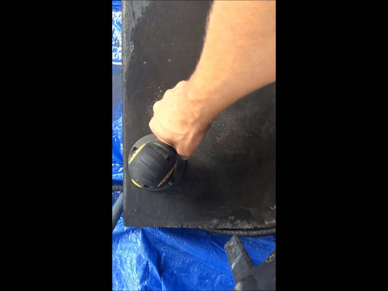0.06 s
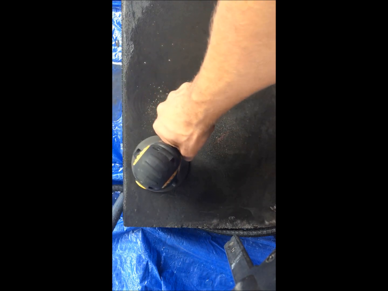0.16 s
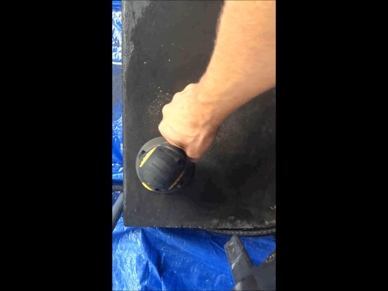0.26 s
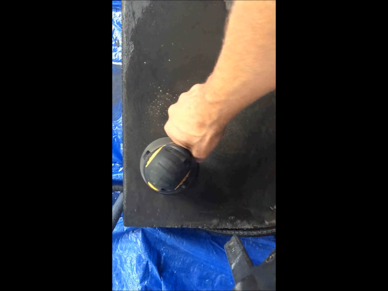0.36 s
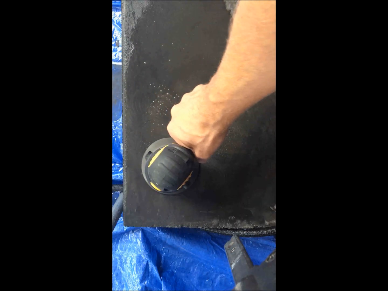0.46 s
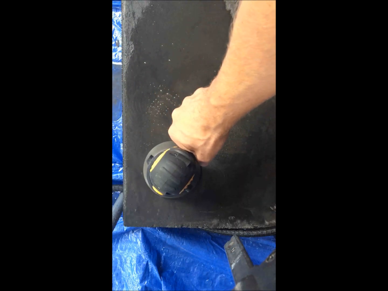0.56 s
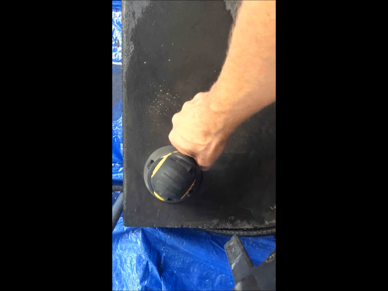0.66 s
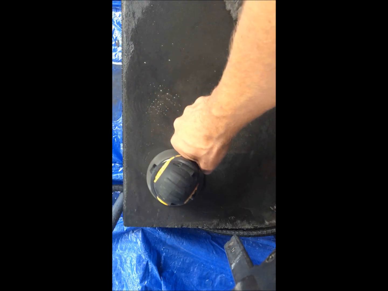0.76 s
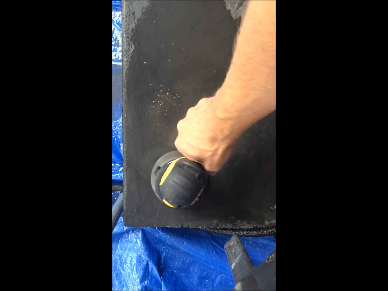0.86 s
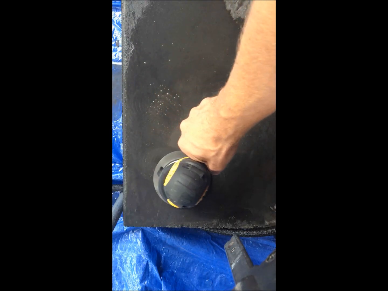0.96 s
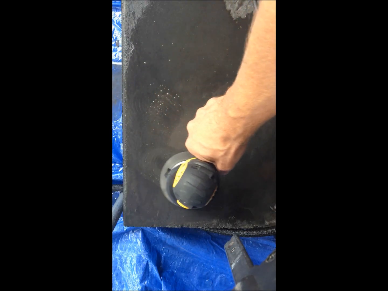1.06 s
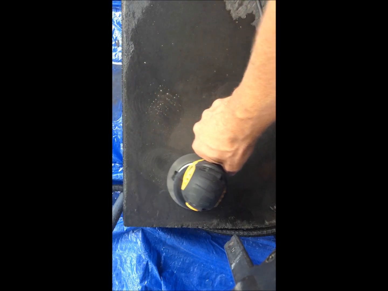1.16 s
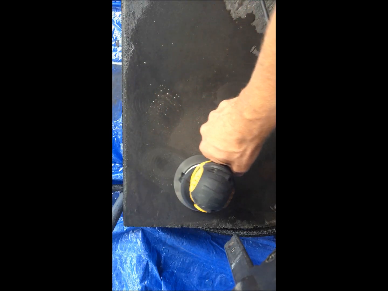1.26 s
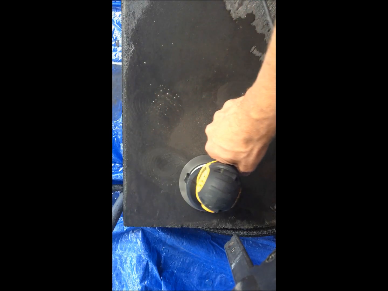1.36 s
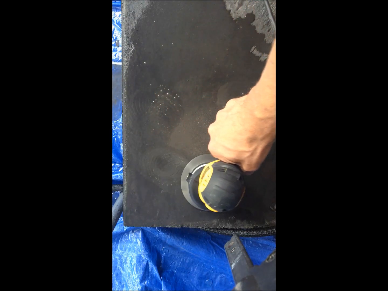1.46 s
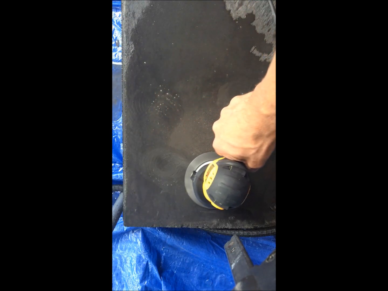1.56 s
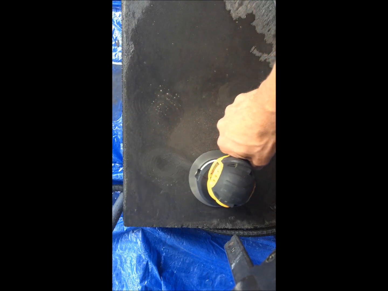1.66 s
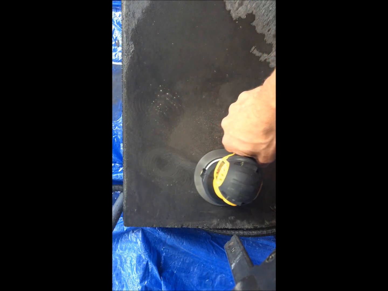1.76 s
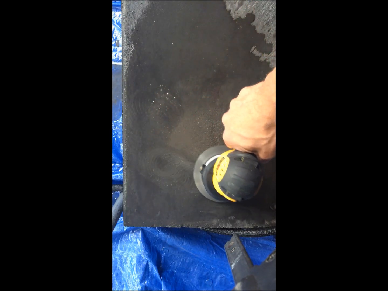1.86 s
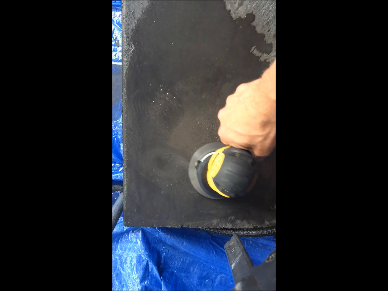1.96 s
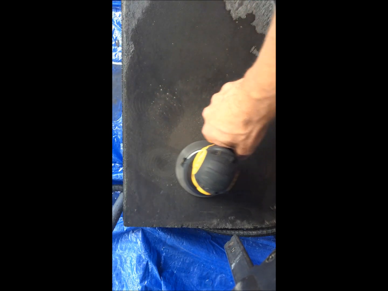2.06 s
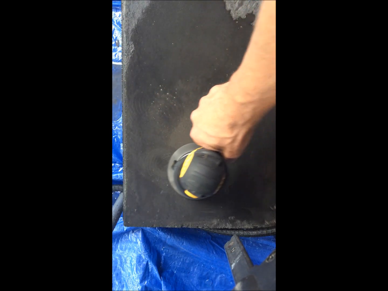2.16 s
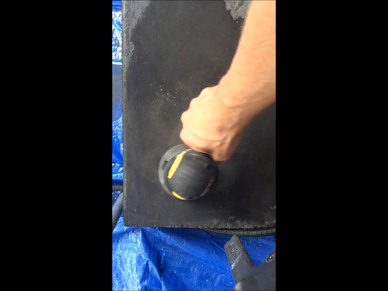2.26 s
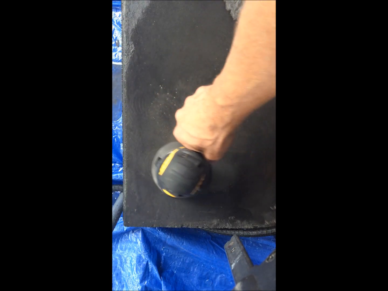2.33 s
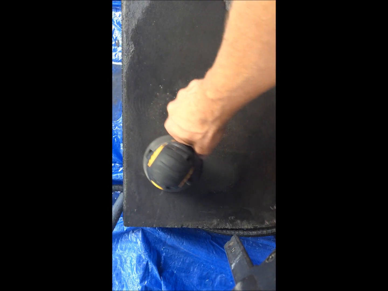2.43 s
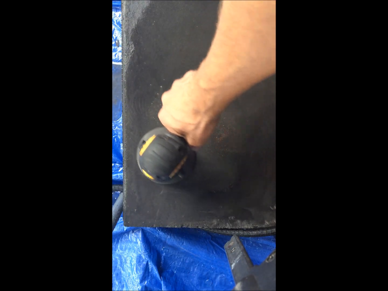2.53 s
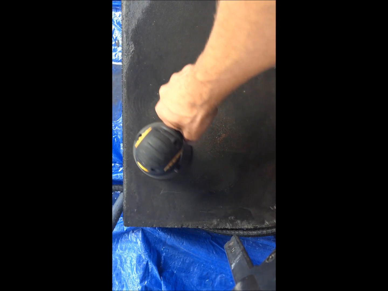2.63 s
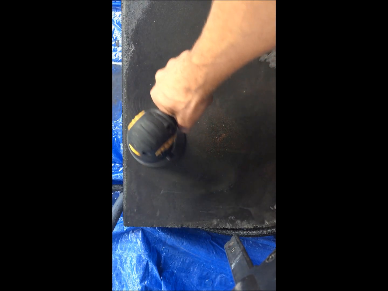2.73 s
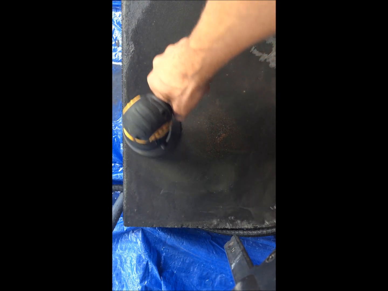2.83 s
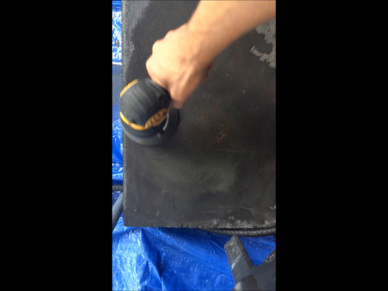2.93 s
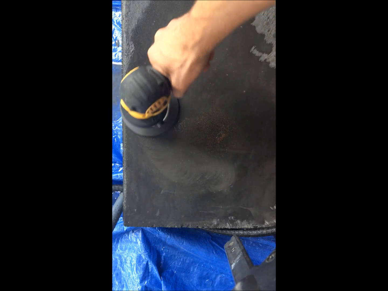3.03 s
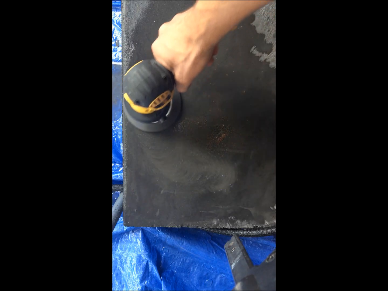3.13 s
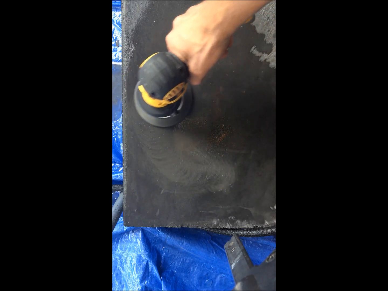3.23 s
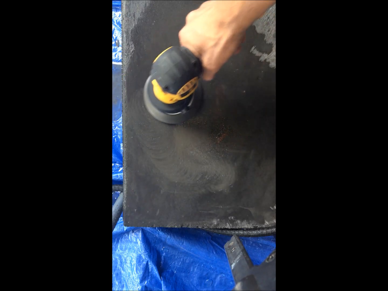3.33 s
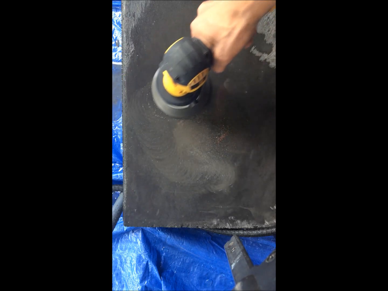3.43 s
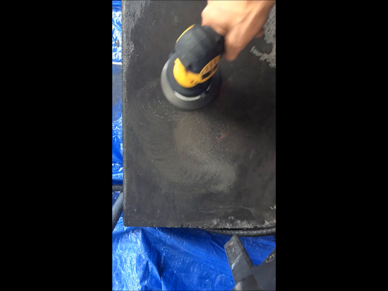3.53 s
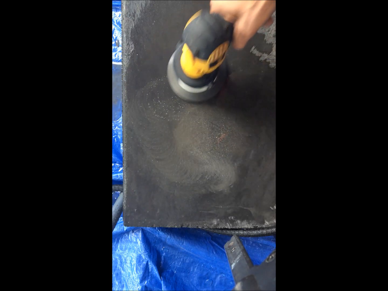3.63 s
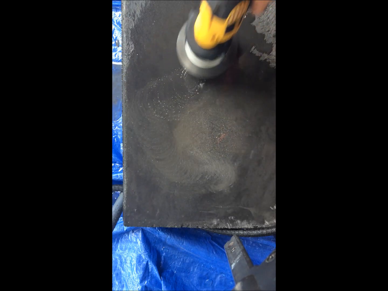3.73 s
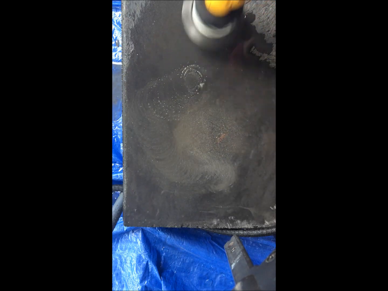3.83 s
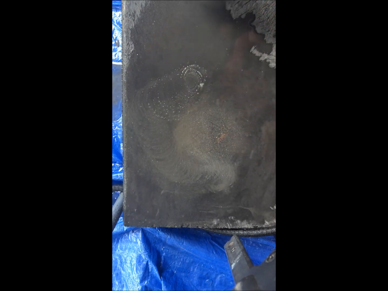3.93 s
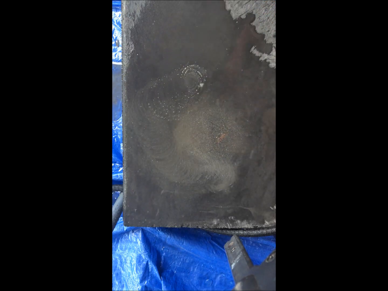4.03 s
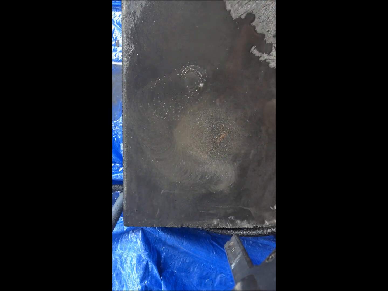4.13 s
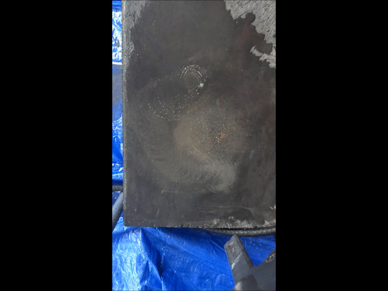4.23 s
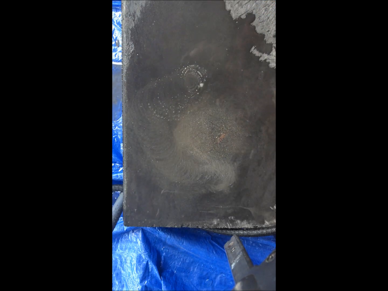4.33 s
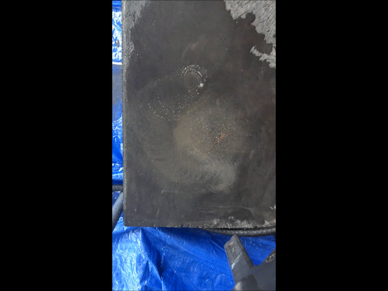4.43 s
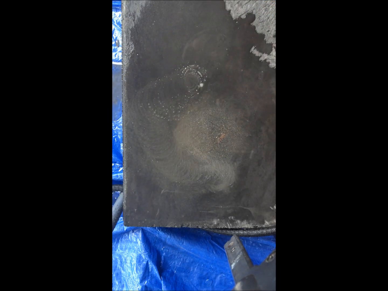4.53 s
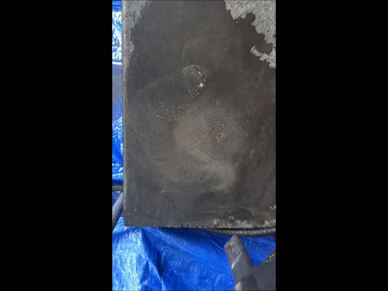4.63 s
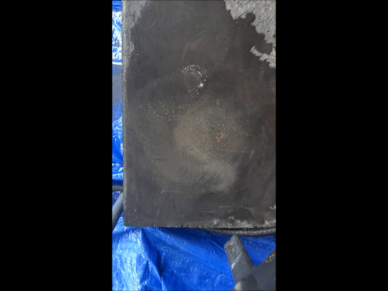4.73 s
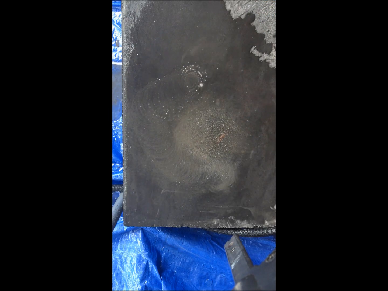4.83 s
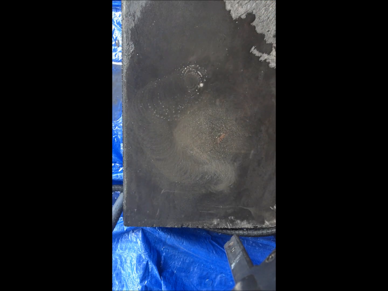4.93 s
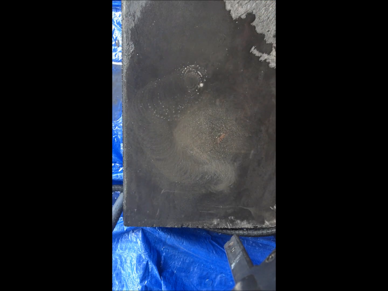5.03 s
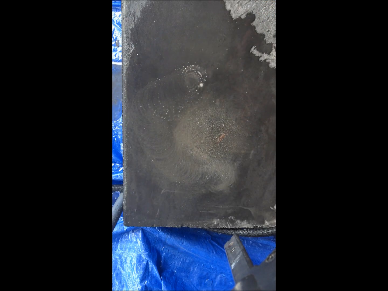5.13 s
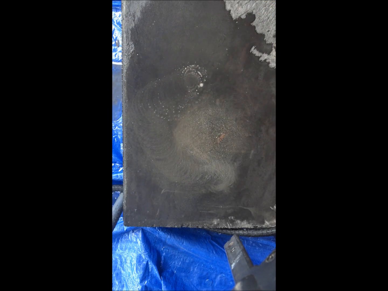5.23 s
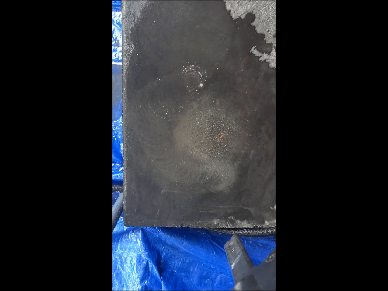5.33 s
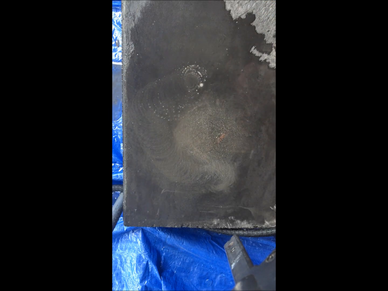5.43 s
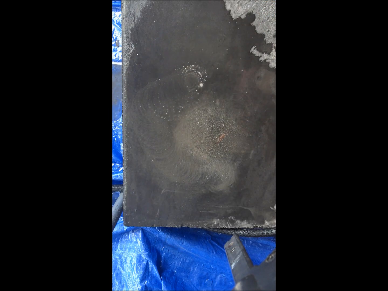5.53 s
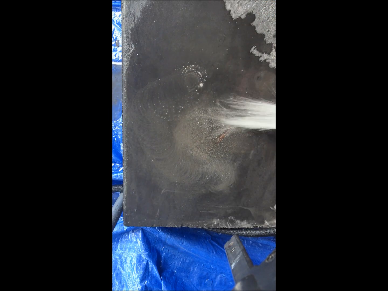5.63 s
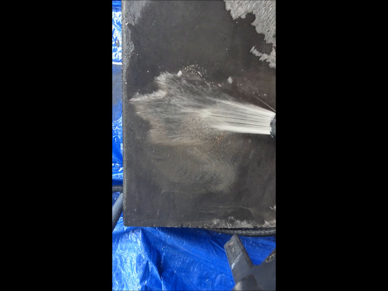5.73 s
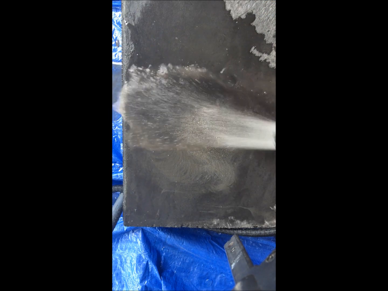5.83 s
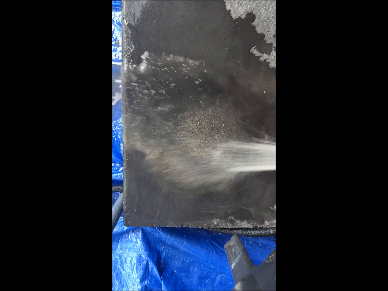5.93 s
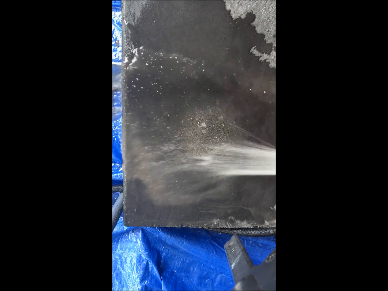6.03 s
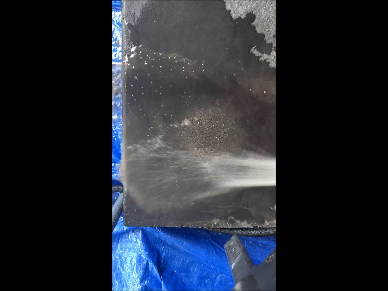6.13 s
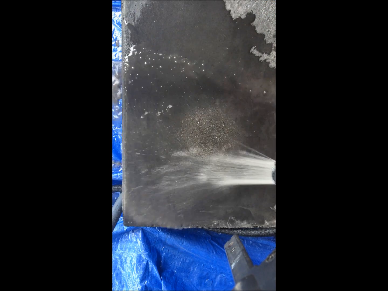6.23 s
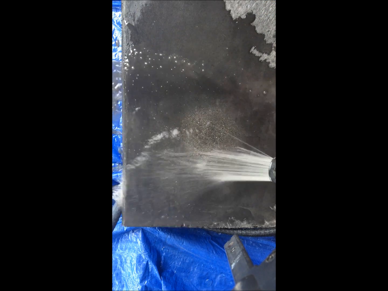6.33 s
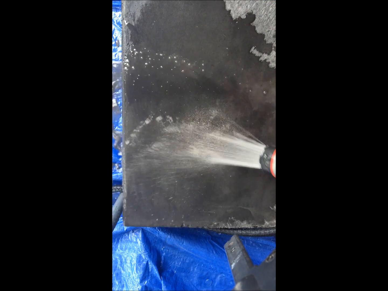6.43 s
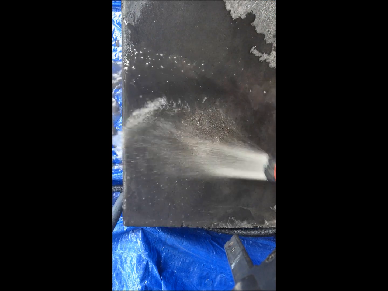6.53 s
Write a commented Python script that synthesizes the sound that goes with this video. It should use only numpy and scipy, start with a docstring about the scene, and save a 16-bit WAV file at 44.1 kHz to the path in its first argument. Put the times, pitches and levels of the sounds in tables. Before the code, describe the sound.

Harsh buzzing sander on a concrete slab stops and spins down; thud, small taps, a nozzle clack, then hissing water spray and soft tarp slaps.

```python
"""A hand-held orbital sander grinds a wet concrete slab: grit noise rings the pad, which rocks and bites.
A low note swells as it is tipped off; then it is lifted, and the grinding dies ever faster.
Switched off, its whine of shaft harmonics and its fan noise sink, and it is put aside with a thud.
A hose nozzle comes free with a clack, heard as a short noisy drag and two blows.
It opens in two spurts and sprays the slab with filtered grains; water slaps a drumming plastic tarp."""
import sys
import numpy as np
from scipy import signal
from scipy.fft import rfft, irfft
from scipy.io import wavfile
from scipy.ndimage import uniform_filter1d

SR = 44100
rng = np.random.default_rng(int(sys.argv[2]) if len(sys.argv) > 2 else 0)


def log_audio(samples):
    """Write samples as a 16-bit WAV file to the path given in sys.argv[1]."""
    # one column per channel
    frames = np.atleast_2d(samples).T
    # limit to full scale, then quantise
    limited = np.clip(frames, -1, 1)
    pcm = np.round(limited * 32767).astype(np.int16)
    wavfile.write(sys.argv[1], SR, pcm)


N = 290178
T = np.arange(N) / SR


def amp(db):
    """Decibels to gain."""
    return 10 ** (np.asarray(db) / 20)


def unit(x):
    """Scales to rms 1."""
    return x / np.sqrt(np.mean(x ** 2) + 1e-20)


def curve(rows, index=1):
    """One column of a table of times, joined by straight lines at every sample."""
    rows = np.asarray(rows)
    return np.interp(T, rows[:, 0], rows[:, index])


def ramp(start, length):
    """Rises from 0 to 1."""
    return np.clip((T - start) / length, 0, 1)


def envelope(start, attack_s, hold_s, t60):
    """Rises, holds, then dies by 60 dB in t60 seconds."""
    age = np.maximum(T - start - attack_s - hold_s, 0)
    return ramp(start, attack_s) * np.exp(-np.log(1000) * age / t60)


def drift(rate_hz, size=32):
    """Slow random motion of rms 1: noise drawn every few samples and low-passed."""
    slow_t = T[::size]
    count = len(slow_t)
    f = np.fft.rfftfreq(count, size / SR)
    spectrum = rfft(rng.standard_normal(count)) / (1 + (f / rate_hz) ** 2) ** 2
    return np.interp(T, slow_t, unit(irfft(spectrum, count)))


def colour(x, spectrum, size=4096):
    """Causal, minimum-phase filter of unit energy with the given (Hz, dB) shape."""
    hz, db = np.transpose(spectrum)
    log_hz = np.log(abs(np.fft.fftfreq(size, 1 / SR)) + 1)
    log_gain = np.log(amp(np.interp(log_hz, np.log(hz + 1), db)))
    response = np.exp(np.conj(signal.hilbert(log_gain)))
    taps = np.fft.ifft(response).real[:size // 2]
    return signal.oaconvolve(x, taps / np.linalg.norm(taps))[:N]


def resonate(x, hz, width):
    """A resonance of gain 1 that may glide: shifts its centre to 0 Hz, low-passes and shifts back."""
    turn = np.exp(2j * np.pi * np.cumsum(hz * np.ones(N)) / SR)
    r = np.exp(-np.pi * width / SR)
    return 2 * (turn * signal.lfilter([1 - r], [1, -r], x / turn + 1e-18)).real


def resonate_twice(x, hz, width, second_width=None):
    """Two resonances in a row at one centre, for steeper skirts."""
    return resonate(resonate(x, hz, width), hz, second_width or width)


def grains(per_s, spread_db, wash):
    """Random clicks of uneven size over a wash of countless smaller ones, of rms 1."""
    size = amp(spread_db * np.minimum(rng.exponential(1, N), 4))
    clicks = size * rng.choice([-1, 1], N) * (rng.random(N) < per_s / SR)
    return unit(unit(clicks) + wash * rng.standard_normal(N))


def blow(s, db, t60, snap):
    """A contact: one sharp impulse and a quickly dying chatter."""
    age = np.arange(N) - round(s * SR)
    decay = np.exp(-np.log(1000) * abs(age) / SR / t60)
    chatter = (age >= 0) * rng.standard_normal(N) * decay
    return amp(db) * (snap * (age == 0) + chatter)


def room(x, t60_low, t60_mid, t60_high, size=32768):
    """A diffuse tail of noise, each frequency with its own decay."""
    hz, t, z = signal.stft(rng.standard_normal(size), SR, nperseg=256)
    t60 = np.interp(hz, [200, 1500, 6500], [t60_low, t60_mid, t60_high])
    tail = signal.istft(z * amp(-60 * t / t60[:, None]), SR)[1]
    tail *= np.minimum(T[:len(tail)] / 0.0091, 1)  # the echoes build up over some milliseconds
    return signal.oaconvolve(x, tail / np.linalg.norm(tail))[:N]


def pressure(bite_s, flutter_db, uneven_db):
    """Contact force of the pad: rocking, single bites, uneven grit and a fast flutter, levelled in power."""
    # The tilted pad rocks. Each row: time in seconds, depth in dB.
    rocking_rows = [(0, 1.8), (.25, .7), (.72, 7.9), (1.2, 4.4), (1.6, 4.2), (1.95, 0)]
    # The pad bites harder for an instant, most of all as it leaves. Each row: time in seconds, surge in dB.
    bite_rows = [(1.888, 0.5), (2.538, 4), (2.595, 3), (2.798, 2), (2.877, 3), (3.226, 5), (3.279, 4),
                 (3.431, 5.5), (3.492, 4), (3.549, 8), (3.578, 7), (3.621, 12.5)]
    # Deep rocking is slower: rate at no depth, its sag, and the moment of one crest.
    rock_hz, sag_hz_per_db, crest_s = 18.25, .1125, .9965
    depth_db = curve(rocking_rows)
    turns = np.cumsum(rock_hz - sag_hz_per_db * depth_db) / SR
    db = depth_db * np.cos(2 * np.pi * (turns - np.interp(crest_s, T, turns)))
    db += flutter_db * drift(150) + uneven_db * drift(25)
    db += sum(surge_db * np.exp(-((T - s) / bite_s) ** 2) for s, surge_db in bite_rows)
    # dividing by the smoothed power leaves the quick motion but no slow change of level
    power = uniform_filter1d(uniform_filter1d(amp(db) ** 2, size=5000), size=5000)
    return amp(db) / np.sqrt(power)


def squeaking(modes):
    """Stick and slip makes one pad mode or another sing for some milliseconds, its pitch unsteady."""
    total = 0
    for hz, _, db in modes:
        loudness = amp(db) * np.clip(drift(55) - .5, 0, 1.1)
        turns = np.cumsum(hz * (1 + .016 * drift(90))) / SR
        total = total + loudness * np.sin(2 * np.pi * turns)
    return unit(total)


def grinding():
    """Grit tears at the concrete and rings the pad, whose modes squeak in turn."""
    # How hard the hand presses the pad on the slab. Each row: time in seconds, grinding level in dB.
    press_rows = [(0, -20.5), (.85, -20.5), (1.75, -17.5), (1.98, -15.5), (2.2, -21), (2.38, -19.5),
                  (3.0, -22), (3.32, -23), (3.46, -19)]
    # Pad and housing. Each row: centre in Hz, width of each resonance stage in Hz, relative level in dB.
    pad_modes = [(2210, 141, -20.5), (2920, 196, -1.5), (3122, 180, 0.5), (3470, 150, 1.5),
                 (3760, 260, 0.5), (3990, 100, 0), (4326, 130, -1), (4575, 180, -0.5)]
    # A shrill band that sinks as the pad is pushed along. Each row: time in seconds, centre in Hz.
    shrill_pitch = [(1.7, 4300), (1.97, 3910), (2.4, 3700)]
    # Spectra of the coarse tearing and the fine fizz. Each row: frequency in Hz, density in dB per Hz.
    rasp_shape = [(200, -44.5), (700, -35.5), (1200, -17), (2000, -8), (2600, -2.5), (3000, 5), (4500, 0),
                  (4800, -7), (6000, -2), (9000, -17.5)]
    fizz_shape = [(3500, -41), (5000, 2), (6400, 2.5), (7200, -1), (8600, -2), (9900, -5.5), (10500, -8),
                  (13000, -12.5)]
    # Fizz and shrill: level or share at the usual pressure in dB, and dB gained per dB of extra pressure.
    usual_press_db = -19.5
    fizz_db, fizz_follow = -26, .35
    shrill_db, shrill_follow = -5, 2.3
    lift_s, lift_length_s, lift_db = 3.451, .19, -23

    press_db = curve(press_rows)
    extra_db = press_db - usual_press_db
    # lifted clear, the grinding dies ever faster: its fall in dB grows as time squared
    contact = amp(lift_db * (np.maximum(T - lift_s, 0) / lift_length_s) ** 2)
    force = contact * pressure(bite_s=0.0092, flutter_db=0.8, uneven_db=.5)

    grit = grains(per_s=4900, spread_db=2.0, wash=1.0)
    ring = unit(sum(amp(db) * resonate_twice(grit, hz, width) for hz, width, db in pad_modes))
    voice = amp(-7.5) * ring + amp(-5.5) * squeaking(pad_modes)
    rasp = colour(grains(per_s=3000, spread_db=2.5, wash=0.64), rasp_shape)

    centre = curve(shrill_pitch)
    share = amp(shrill_db + shrill_follow * extra_db)
    shrill = unit(resonate_twice(rng.standard_normal(N), centre, 920, 800) * amp(1.7 * drift(90)))
    # the root makes room for the shrill band as it comes forward
    body = (voice + amp(-2.0) * rasp + share * shrill) / np.sqrt(1 + share ** 2)

    fizz = colour(grains(per_s=6000, spread_db=4.0, wash=1.3), fizz_shape) * amp(1.18 * drift(40))
    return force * (amp(press_db) * body + amp(fizz_db + fizz_follow * extra_db) * fizz)


def whining(shaft_hz, speed):
    """Hum and whine at multiples of the shaft rate, lifted where they slide through housing resonances."""
    # Each row: multiple of the shaft rate, level at full speed in dB.
    shaft_orders = [(1, -64), (2, -65), (12, -50.5), (18, -53), (19, -55), (24, -48), (36, -58)]
    # Housing resonances. Each row: centre in Hz, width in Hz, gain of the added resonance in dB.
    housing_modes = [(6380, 100, 1), (5420, 330, 13.5), (4720, 100, 6), (3170, 120, 2)]
    turns = np.cumsum(shaft_hz * (1 + .0035 * drift(160))) / SR  # slightly unsteady rotation
    tones = 0
    for order, db in shaft_orders:
        tones = tones + amp(db + 1.51 * drift(18)) * np.sin(2 * np.pi * order * turns)
    whine = speed ** 2.7 * tones
    return whine + sum(amp(db) * resonate(whine, hz, width) for hz, width, db in housing_modes)


def motor():
    """The fan rushes through its hollow housing and whines; switched off, the shaft slows evenly."""
    # Motor speed while it is switched on. Each row: time in seconds, shaft turns per second.
    running_rows = [(0, 275), (1.9, 285), (3.6, 267.9)]
    # Fan air. Each row: frequency in Hz, density in dB per Hz.
    fan_shape = [(150, -35.5), (450, -16.5), (800, -5.5), (1150, -5), (1500, -6), (1800, -6.5), (2200, -16),
                 (4000, -9.5), (9200, -9.5), (10500, -17), (13000, -20)]
    off_s, brake_hz_per_s = 3.697, 162  # friction brakes the shaft
    # Fan rush and bearing hiss at full speed; each fades as a power of the speed.
    rush_db, rush_power = -44.5, 3
    hiss_db, hiss_power = -38.5, 2.33
    # The hollow booms as the falling speed passes this share of full speed.
    boom_speed, boom_width, boom_db = .89, .115, 12

    running_hz = curve(running_rows)
    shaft_hz = np.maximum(running_hz - brake_hz_per_s * np.maximum(T - off_s, 0), 0)
    speed = shaft_hz / running_hz
    whine = whining(shaft_hz, speed)

    air = colour(grains(per_s=2500, spread_db=1.0, wash=1.15), fan_shape)
    low_pass = signal.butter(4, 2200, "low", fs=SR, output="sos")
    high_pass = signal.butter(4, 2200, "high", fs=SR, output="sos")
    rush, hiss = unit(signal.sosfilt(low_pass, air)), unit(signal.sosfilt(high_pass, air))

    hollow = unit(resonate_twice(rng.standard_normal(N), 1170, 290))
    boom = amp(boom_db * np.exp(-((speed - boom_speed) / boom_width) ** 2))
    flow = amp(rush_db) * speed ** rush_power * (rush + .44 * boom * hollow)
    flow = flow + amp(hiss_db) * speed ** hiss_power * hiss
    fade = 1 - ramp(4.5, 0.25)  # the last of the motor sound goes out
    return (flow * amp(0.61 * drift(70)) + whine) * fade


def drone():
    """A low note, narrow resonant noise, swells as the sander is tipped off the slab."""
    note = unit(resonate_twice(rng.standard_normal(N), 246, 25))
    return amp(-56) * envelope(2.9, attack_s=0.48, hold_s=0.091, t60=0.61) * note


def landing():
    """The sander lands and rocks in blows of noise, and the work table shudders after each one."""
    # Each row: time in seconds, level in dB.
    thud_rows = [(4.7732, -17), (4.7758, -18), (4.791, -38), (4.8414, -25.5)]
    # Tone of the thuds. Each row: frequency in Hz, density in dB per Hz.
    thud_shape = [(40, -22), (130, 0.5), (215, -8), (300, -1.5), (750, -6.5), (950, -11.5), (1400, -9),
                  (1900, -13), (5500, -20), (13000, -32)]
    shudder_db, shudder_t60 = -19.5, 0.39  # level against the thud; ring time in seconds
    shudder = 0
    for s, db in thud_rows:
        swell = envelope(s, attack_s=0.0034, hold_s=.005, t60=shudder_t60)
        shudder = shudder + amp(db + shudder_db) * swell
    shudder = shudder * grains(per_s=700, spread_db=1.5, wash=1)
    blows = sum(blow(s, db, t60=0.032, snap=5.4) for s, db in thud_rows)
    return colour(shudder + blows, thud_shape)


def nozzle_pickup():
    """The nozzle drags as a short burst of grains and comes free with hard knocks."""
    # Each row: time in seconds, level in dB.
    clack_rows = [(5.1135, -17.5), (5.1173, -24.5)]
    # Tone of the knocks. Each row: frequency in Hz, density in dB per Hz.
    clack_shape = [(90, -14), (400, -13.5), (620, -7), (850, -11), (1400, 2.5), (2100, -12.5), (2700, -6),
                   (3200, -15), (6000, -18.5), (13000, -32)]
    drag = amp(-32.5) * envelope(5.071, attack_s=0.015, hold_s=0.032, t60=0.094)
    drag = drag * grains(per_s=970, spread_db=1, wash=0.87)
    blows = sum(blow(s, db, t60=0.045, snap=1.2) for s, db in clack_rows)
    return colour(drag + blows, clack_shape)


def rustling():
    """Cord and hose rustle as unsteady grains, with small plastic taps among them."""
    # Each row: time in seconds, level in dB, time to die by 60 dB in seconds.
    tick_rows = [(4.525, -36.5, 0.027), (4.612, -35, 0.073), (4.621, -34.5, 0.065), (4.687, -32.5, 0.044),
                 (4.717, -37, 0.052), (4.839, -40, 0.021), (4.875, -37, .03), (4.931, -30, 0.041),
                 (6.326, -38, .05)]
    # Tone of the taps. Each row: frequency in Hz, density in dB per Hz.
    tick_shape = [(200, -6.5), (1200, -4), (3300, -0.5), (4200, -5.5), (8500, -6), (13000, -19)]
    rustle = amp(-47.0) * envelope(4.39, attack_s=0.33, hold_s=0.38, t60=0.92)
    rustle = rustle * grains(per_s=500, spread_db=1.5, wash=1) * amp(2.6 * drift(40))
    taps = sum(blow(s, db, t60, snap=1) for s, db, t60 in tick_rows)
    return colour(rustle + taps, tick_shape)


def handling():
    """Sander, nozzle and rustle are heard directly and as a diffuse echo round the work space."""
    thuds, clacks, ticks = landing(), nozzle_pickup(), rustling()
    sent = amp(-13.5) * thuds + amp(-8.5) * clacks + amp(-11.5) * ticks
    return thuds + clacks + ticks + room(sent, t60_low=0.46, t60_mid=0.5, t60_high=0.21)


def hose():
    """The nozzle leaks a faint hiss; opened, it spurts, then sprays the slab with a hollow note."""
    # The valve opens in two spurts under stored pressure. Each row: time in seconds, level in dB.
    spurt_rows = [(5.593, -38), (5.641, -31)]
    # Spectra of leak, spurts and spray. Each row: frequency in Hz, density in dB per Hz.
    leak_shape = [(6500, -36), (8250, 1), (8700, -8), (9800, -1.5), (10600, -18), (13000, -21.5)]
    spurt_shape = [(400, -22), (800, -13), (1700, -19), (2600, -8.5), (4400, -9), (6800, -1), (13000, -11)]
    spray_shape = [(300, -24), (850, -9), (1400, -13), (3100, -15.5), (5300, -4.5), (7900, -5.5),
                   (9300, -1.5), (13000, -3)]
    leak = amp(-59.5) * colour(rng.standard_normal(N), leak_shape)
    surge = sum(amp(db) * envelope(s, attack_s=0.016, hold_s=0.0054, t60=0.46) for s, db in spurt_rows)
    spurt = surge * colour(grains(per_s=4500, spread_db=4, wash=0.96), spurt_shape)
    drops = colour(grains(per_s=3500, spread_db=3.0, wash=0.98), spray_shape) * amp(1.1 * drift(27))
    note = amp(-19.0) * unit(resonate_twice(rng.standard_normal(N), 704, 90))
    spray = amp(-38.5) * ramp(5.59, 0.025) * (drops + note)
    return leak + spurt + spray


def tarp():
    """The plastic sheet drums softly at one low note, and louder where water slaps it."""
    # Water slaps the tarp. Each row: time in seconds, level of the blow ahead of the skin in dB.
    slap_rows = [(6.023, -53), (6.053, -48), (6.091, -46), (6.212, -59), (6.328, -37), (6.503, -47.5)]
    # Tone of the skin. Each row: frequency in Hz, density in dB per Hz.
    skin_shape = [(60, -25), (170, -22), (235, -2), (320, -4), (480, -18), (1200, -13.5), (4000, -35.5)]
    # a constant faint patter, and more of it once the spray reaches the tarp
    patter_gain = amp(-66) + amp(-59) * ramp(5.95, 0.17)
    patter = patter_gain * grains(per_s=33, spread_db=2.5, wash=0.8)
    slaps = sum(blow(s, db, t60=0.11, snap=21.0) for s, db in slap_rows)
    skin = colour(patter + slaps, skin_shape)
    return amp(-4) * skin + resonate(skin, 241, 28)


def background():
    """A quiet work space: steady coloured noise and a low, unsteady hum."""
    # Each row: frequency in Hz, density in dB per Hz.
    hush_shape = [(25, -22), (60, -15.5), (90, -11), (240, -14), (500, -16), (1100, -18), (3000, -36.5),
                  (7000, -35.5)]
    hum = amp(-63.5 + 2.2 * drift(6)) * np.sin(2 * np.pi * (60.3 * T + .08 * drift(5)))
    return hum + amp(-59.5) * colour(rng.standard_normal(N), hush_shape)


def scene():
    """All sources at one close microphone."""
    sander = grinding() + motor() + drone()
    water = hose() + tarp()
    return (sander + handling() + water + background())[None]


def record(dry):
    """The recorder's band limit: a steep low-pass at 13200 Hz."""
    taps = signal.firwin(601, 13200, window=("kaiser", 9), fs=SR)
    return signal.oaconvolve(dry, taps[None], "same")


dry = scene()
out = record(dry)
log_audio(out)
```